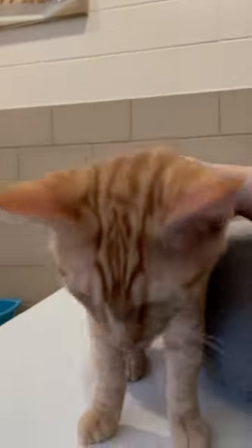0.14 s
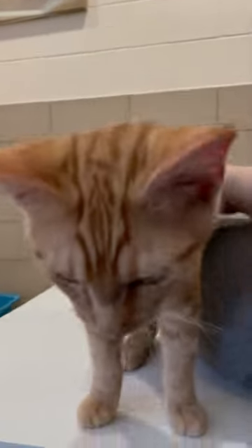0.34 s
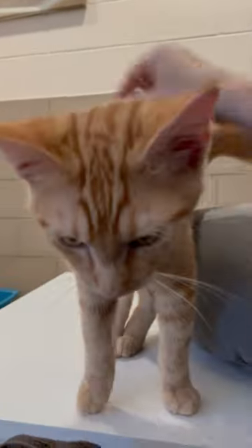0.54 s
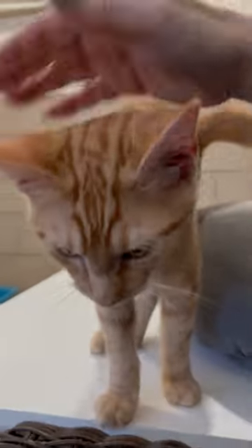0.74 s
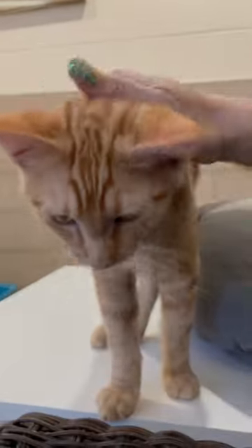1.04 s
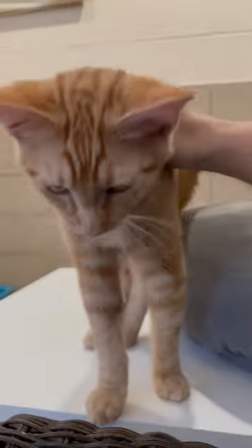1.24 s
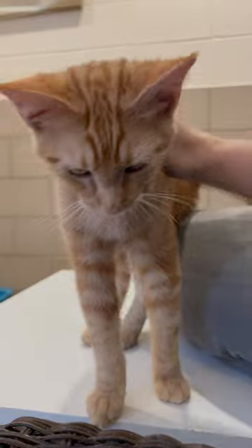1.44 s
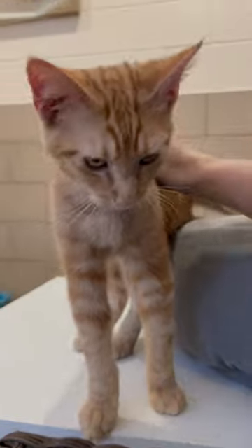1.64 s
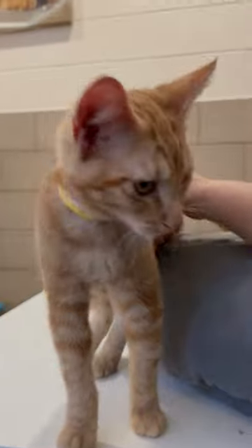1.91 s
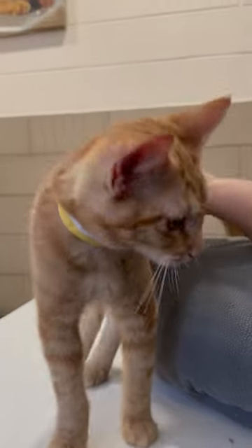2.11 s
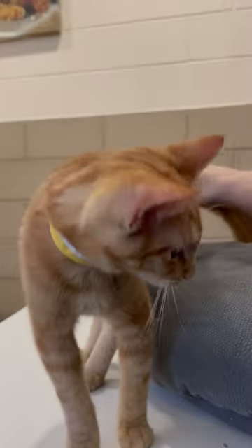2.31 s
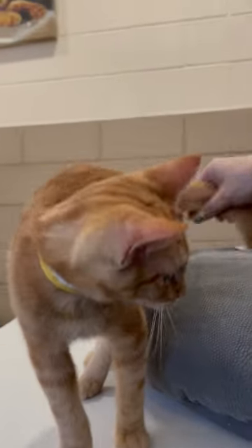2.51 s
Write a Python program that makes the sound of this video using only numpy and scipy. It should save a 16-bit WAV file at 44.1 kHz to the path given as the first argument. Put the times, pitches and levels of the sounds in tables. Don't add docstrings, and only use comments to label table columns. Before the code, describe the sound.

Hand brushing short cat fur in quiet swishes, one tiny sharp click, above steady low ventilation rumble

```python
import sys
import numpy as np
from scipy import signal
from scipy.fft import rfft, irfft, next_fast_len
from scipy.io import wavfile
from scipy.ndimage import uniform_filter1d, map_coordinates

SR = 44100
rng = np.random.default_rng(int(sys.argv[2]) if len(sys.argv) > 2 else 0)


def gain_from_decibels(decibels):
    exponent = np.asarray(decibels, float) / 20
    return 10 ** exponent


def dump(signal):
    limited = np.clip(np.atleast_2d(signal).T, -1, 1)
    pcm = np.round(limited * 32767).astype(np.int16)
    wavfile.write(sys.argv[1], SR, pcm)


N = 117306

# start_s, low_db, middle_db, upper_db
STANDING_WAVES = [(0.0, -46, -44.5, -63.5), (0.06, -57.5, -57.5, -50), (0.27, -42, -47, -46.5),
                  (0.62, -48.5, -42.5, -50.5), (0.72, -34, -54, -47.5), (1.01, -53, -44.5, -51),
                  (1.34, -41.5, -42, -45), (1.44, -46, -51, -49.5), (1.5, -45, -46.5, -46),
                  (1.56, -50.5, -38.5, -49), (1.68, -40.5, -43.5, -51), (1.77, -71, -45, -47.5),
                  (1.9, -41.5, -43, -46.5), (2.33, -45.5, -41.5, -37.5), (2.39, -39.5, -61, -46.5),
                  (2.44, -40, -35, -36.5), (2.5, -63, -49.5, -43), (2.66, -42.5, -43.5, -44.5)]
STANDING_WAVE_HZ = [63.6, 90.36, 120.73]
UPPER_PULL_HZ_PER_DB = 0.5
WANDER_HZ, WANDER_RATE, FLUTTER_DB, FLUTTER_RATE = 2.8, 9, 2.5, 16

# pitch_hz, level_db (per Hz)
RUMBLE = [(20, -18.5), (30, -7.5), (42, -4.5), (60, 13.5), (110, 1), (200, -4.5), (300, -9.5), (480, -22.5)]
# pitch_hz, level_db (per Hz)
AIR = [(300, -3), (550, -3.5), (800, -7.5), (1050, -8), (1700, -19), (2600, -21.5), (4200, -34),
       (18000, -45.5)]
# pitch_hz, likeness (0 to 1)
AIR_ALIKE = [(60, .9995), (160, 1), (270, 0.99), (450, .68), (740, 0.33), (1220, 0.49), (2010, .55),
             (6500, 0.9)]
# pitch_hz, width_hz, level_db
DUCT = [(108.3, 6, 7), (166.5, 23.3, 1.5), (194.3, 10, 3.5), (210.6, 8.6, -1), (244.2, 22, -2.5),
        (263.2, 12, -6.5), (291, 13.4, -6), (359.4, 6.9, -9.5), (378.2, 10, -13.5), (442.8, 14, -19)]
# time_s, level_db
FLOW = [(0, 1.5), (.3, 0.5), (.6, .5), (1.1, 0.5), (1.45, 1), (1.7, -1), (1.95, 0), (2.2, 0.5), (2.4, 3),
        (2.66, 0)]
RUMBLE_DB, AIR_DB, DUCT_DB, SHAFT_DB = -46, -64, -50.5, -68.5
SHAFT_HZ = 29.6
AIR_FOLLOWS = 0.9

# start_s, length_s, level_db, brightness_db (fine hair hiss), rustle_hz (centre)
STROKES = [(-.1, 0.25, -77, -6.5, 7100), (-.02, 0.27, -74.5, -23.5, 4570), (0.348, 0.11, -89, 8, 5500),
           (0.47, .26, -84.5, -20, 4440), (0.471, 0.043, -76.5, -29, 1970), (0.829, 0.18, -83.5, 2.5, 5400),
           (0.939, 0.22, -80, 0, 4250), (1.075, .1, -75.5, -5.5, 5700), (1.097, 0.094, -74.5, -23, 4230),
           (1.202, 0.19, -81, -2, 5400), (1.333, 0.033, -79.5, -11, 2560), (1.348, .055, -80, -17, 5100),
           (1.354, .05, -75.5, -6.5, 9530), (1.389, 0.099, -78, -5, 6620), (1.851, .13, -83.5, -24, 2500),
           (2.295, .27, -85, -9, 4930)]
# time_s, level_db, brightness_db
RUB = [
    (1.75, -104, -10),
    (1.95, -94.5, -6.5),
    (2.02, -86, 1),
    (2.27, -81.5, 2),
    (2.37, -76.5, -3.5),
    (2.55, -81.5, 1.5),
    (2.66, -78.5, -4),
]
# pitch_hz, width_hz, level_db
RUB_RING = [(2500, 400, -5), (3370, 110, 5), (3780, 250, -5)]
# pitch_hz, level_db (per Hz)
COAT = [(700, -33), (1500, 2.5), (2600, 1.5), (4500, -5), (6500, -8), (9000, -12.5), (18000, -25.5)]
# pitch_hz, level_db (per Hz)
HAIR = [(2500, -23), (5000, -10.5), (7500, -1.5), (10000, 0), (12500, -3.5), (14000, -5), (15500, 2),
        (18000, 1.5)]
# pitch_hz, likeness (0 to 1)
FUR_ALIKE = [(1000, 0.44), (2500, 0.51), (3800, 0.68), (6500, 1), (10000, 0.97)]
RING_DB, HAIR_SCATTER_DB = 2.5, 1.5
RUSTLE_Q, RUSTLE_BASE = 5, 0.55
RISE_S, FALL_S, SAG_DB_PER_S, ARCH_DB = 0.0087, 0.04, 10.5, 0.5
HAIR_SAG_DB_PER_S = 25.5

# time_s, pitch_hz, level_db, length_cycles
GLINTS = [
    (0.366, 5500, -73, 6),
    (1.403, 5970, -54, 1.5),
    (2.32, 5000, -79, 30),
    (2.42, 5200, -81, 22),
    (2.44, 4200, -73, 18),
    (2.455, 4800, -70.5, 20),
]

# pitch_hz, left_lead_rad
PORTS = [(1550, -.4), (2500, .6), (4390, .9), (5100, -.1), (6900, 2.35), (7750, 3.14), (8400, 3.75),
         (11000, 6.28), (13100, 8.6), (14200, 9.42), (15000, 10), (15800, 10.6)]
# pitch_hz, left_lead_rad
PORTS_BASS = [(0, 0), (300, 0)]
# pitch_hz, left_over_right_db
LEFT_DB = [(500, 0.5), (2000, 1.1), (8000, -0.1)]
END_FADE_S = 0.008


def unit(x):
    return x / np.sqrt(np.mean(x ** 2) + 1e-20)


def along(points, hz):
    f, v = np.transpose(points)
    return np.interp(np.log(hz + 1), np.log(f + 1), v)


def curves(rows):
    s, *columns = np.transpose(rows)
    return [np.interp(np.arange(N) / SR, s, column) for column in columns]


def wobble(rate):
    return map_coordinates(rng.standard_normal(400), [np.arange(N) * rate / SR])


def filtered(x, response):
    m = next_fast_len(N + SR // 2)
    hz = np.fft.rfftfreq(m, 1 / SR)
    return irfft(rfft(x, m) * response(hz), m)[..., :N]


def resonant(peaks):
    def response(f):
        total = 0
        for k, (centre, width, db) in enumerate(peaks):
            damping = 1j * f * width
            total = total + (-1) ** k * gain_from_decibels(db) * damping / (centre * centre - f * f + damping)
        return total
    return response


def spread(pair, spectrum, alike):
    points = [(1, -120)] + spectrum + [(SR / 2, -120)]

    def response(hz):
        turn = np.arccos(np.clip(along(alike, hz), -1, 1)) / 2
        return gain_from_decibels(along(points, hz)) * [np.cos(turn), np.sin(turn)]

    mid, side = filtered(pair, response)
    return unit(np.array([mid + side, mid - side]))


def patchy(patchy_db):
    z = signal.stft(rng.standard_normal((2, N)), nperseg=512)[2]
    field = uniform_filter1d(rng.standard_normal(z.shape[1:]), size=6, axis=0)
    field = uniform_filter1d(field, size=10, axis=1)
    return signal.istft(z * gain_from_decibels(patchy_db * unit(field)), nperseg=512)[1][:, :N]


def drone():
    levels = curves(STANDING_WAVES)
    upper_pull_hz = UPPER_PULL_HZ_PER_DB * (levels[2] - levels[2].mean())
    total = 0
    for db, hz, pull_hz in zip(levels, STANDING_WAVE_HZ, [0, 0, upper_pull_hz]):
        gain = gain_from_decibels(db + 2.5 + FLUTTER_DB * wobble(FLUTTER_RATE))
        pitch_hz = hz + pull_hz + WANDER_HZ * wobble(WANDER_RATE)
        total = total + gain * np.sin(2 * np.pi * np.cumsum(pitch_hz) / SR)
    return total * np.ones((2, 1))


def ventilation():
    flow_db, = curves(FLOW)
    flow_db = flow_db - flow_db.mean()
    rumble = gain_from_decibels(RUMBLE_DB - 3.5) * spread(patchy(-2.47), RUMBLE, AIR_ALIKE)
    air = gain_from_decibels(AIR_DB + AIR_FOLLOWS * flow_db) * spread(patchy(0.46), AIR, AIR_ALIKE)
    flat_noise = spread(patchy(0.4), [(100, 0), (500, 0)], AIR_ALIKE)
    duct = gain_from_decibels(DUCT_DB) * unit(filtered(flat_noise, resonant(DUCT)))
    shaft_gain = gain_from_decibels(SHAFT_DB + 2 + wobble(4.9))
    shaft_hz = SHAFT_HZ + 1.1 * wobble(1.3)
    shaft = shaft_gain * np.sin(2 * np.pi * np.cumsum(shaft_hz) / SR)
    return gain_from_decibels(flow_db) * (rumble + duct) + air + shaft


def hairs():
    clumps = unit(uniform_filter1d(rng.standard_normal(N), size=60))
    return patchy(1.44) * gain_from_decibels(HAIR_SCATTER_DB * np.clip(clumps, -2, 2))


def rub(coat, hair):
    t = np.arange(N) / SR
    level_db, bright_db = curves(RUB)
    ring = unit(filtered(spread(patchy(-0.5), COAT, FUR_ALIKE), resonant(RUB_RING)))
    texture = 0.5 * coat + gain_from_decibels(bright_db) * hair + gain_from_decibels(RING_DB) * ring
    return gain_from_decibels(level_db) * (t > RUB[0][0]) * texture


def stroke(coat, hair, start, hold, db, bright_db, hz):
    t = np.arange(N) / SR
    late = np.maximum(t - start - hold, 0) / FALL_S
    progress = np.clip((t - start) / hold, 0, 1)
    arch_db = ARCH_DB * np.sin(np.pi * progress) - SAG_DB_PER_S * hold * (progress - 0.5)
    shape = np.clip((t - start) / RISE_S, 0, 1) * gain_from_decibels(db + arch_db - 20 * late)
    centre = unit(filtered(coat + 0.48 * hair, resonant([(hz, hz / RUSTLE_Q, 0)])))
    rustle = unit(RUSTLE_BASE * coat + centre)
    hiss = gain_from_decibels(bright_db - HAIR_SAG_DB_PER_S * hold * progress) * hair
    return shape * (rustle + hiss)


def fur():
    coat = spread(hairs(), COAT, FUR_ALIKE)
    hair = gain_from_decibels(3.5) * spread(hairs(), HAIR, FUR_ALIKE)
    total = rub(coat, hair)
    for event in STROKES:
        total = total + stroke(coat, hair, *event)
    return gain_from_decibels(0.5 * wobble(22)) * total


def nail():
    t = np.arange(N) / SR
    total = 0
    for s, hz, db, cycles in GLINTS:
        envelope = np.exp(-((t - s) * hz / cycles) ** 2)
        total = total + gain_from_decibels(db) * envelope * np.sin(2 * np.pi * hz * t)
    return total * np.ones((2, 1))


def scene():
    return drone() * gain_from_decibels([[0.04], [-0.04]]) + ventilation() + fur() + nail()


def top_cut(x):
    return signal.sosfilt(signal.butter(12, 15710, fs=SR, output="sos"), x)


def record(dry):
    f, turn = np.transpose(PORTS_BASS + PORTS)
    balance = PORTS_BASS[:1] + [(200, 0)] + LEFT_DB
    side = np.array([[0.5], [-0.5]])

    def response(hz):
        return np.exp(1j * side * np.interp(hz, f, turn)) * gain_from_decibels(side * along(balance, hz))

    ports = filtered(dry, response)
    fade = np.clip(np.arange(N)[::-1] / SR / END_FADE_S, 0, 1)
    return top_cut(ports * fade)


dry = scene()
out = record(dry)
dump(out)
```